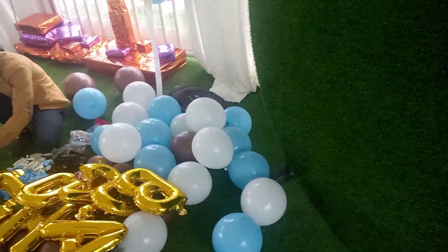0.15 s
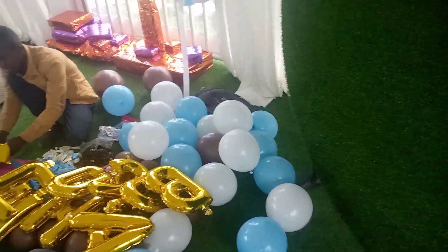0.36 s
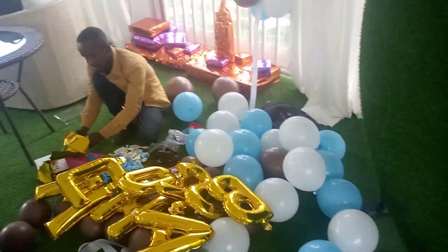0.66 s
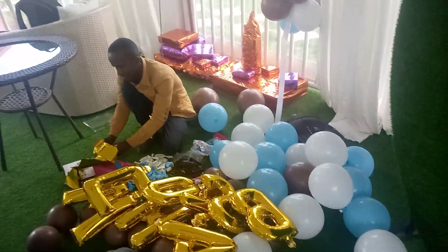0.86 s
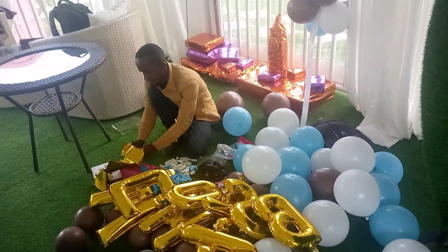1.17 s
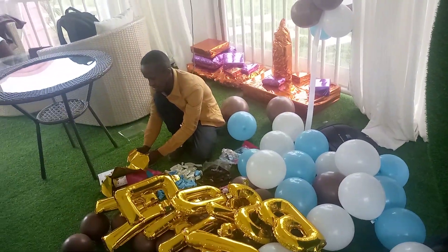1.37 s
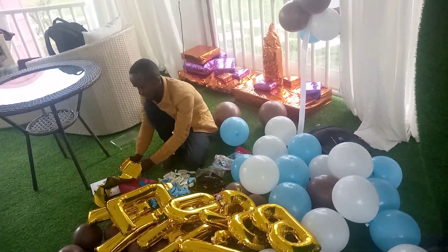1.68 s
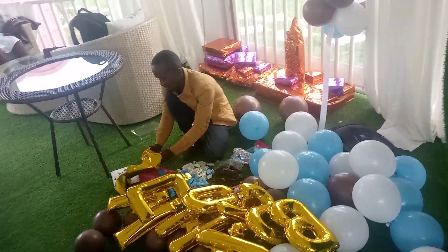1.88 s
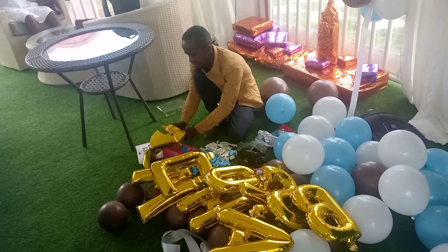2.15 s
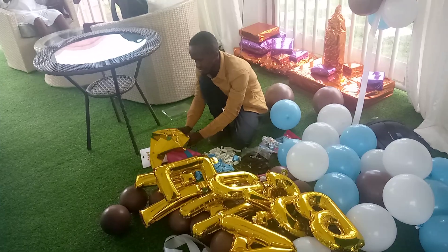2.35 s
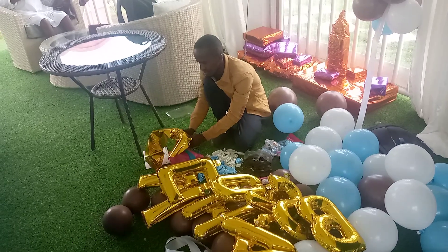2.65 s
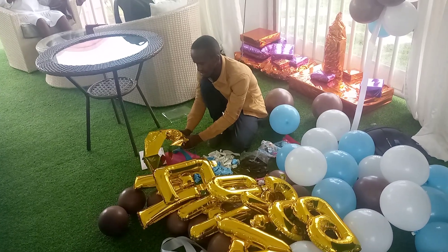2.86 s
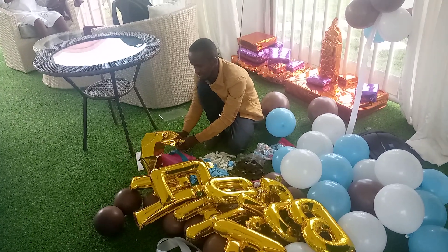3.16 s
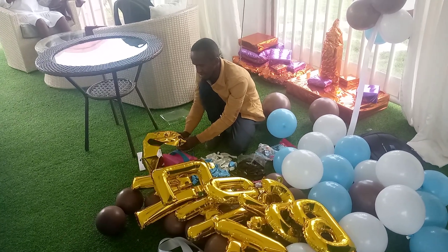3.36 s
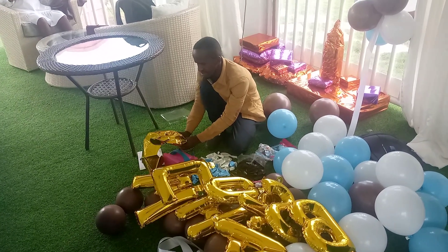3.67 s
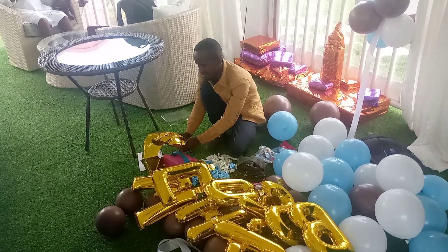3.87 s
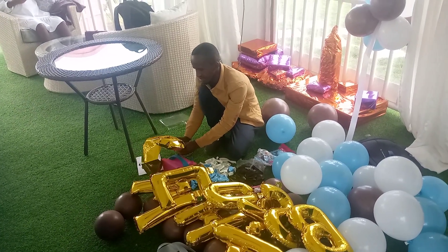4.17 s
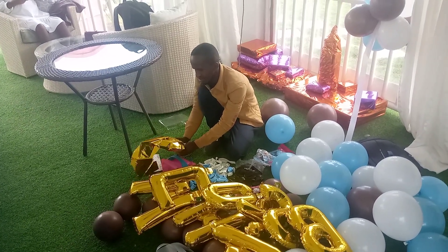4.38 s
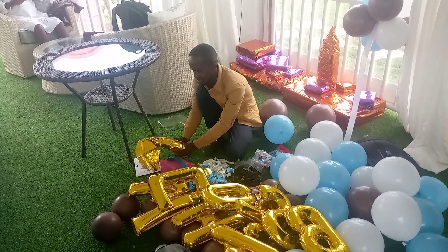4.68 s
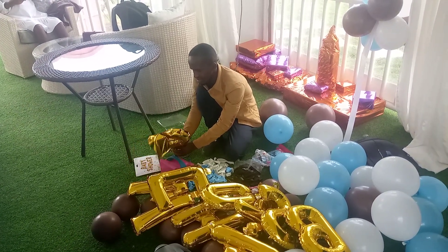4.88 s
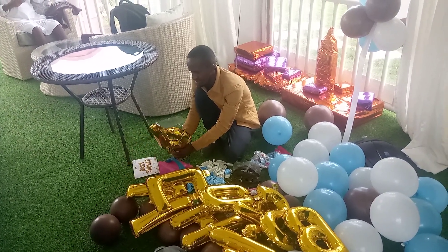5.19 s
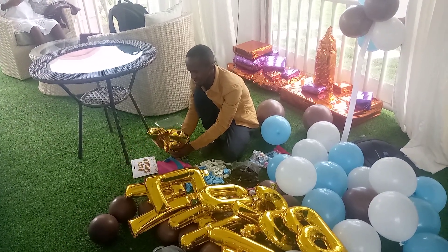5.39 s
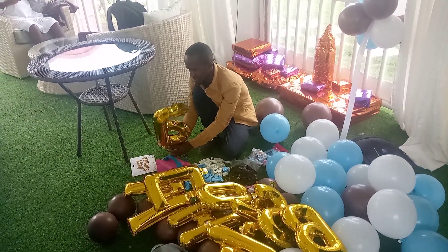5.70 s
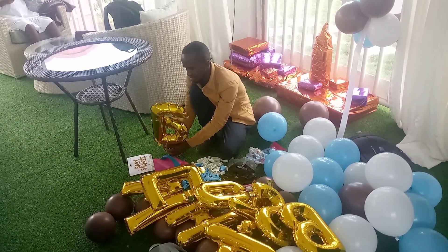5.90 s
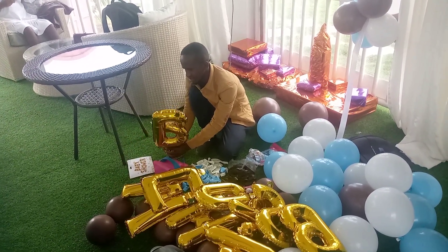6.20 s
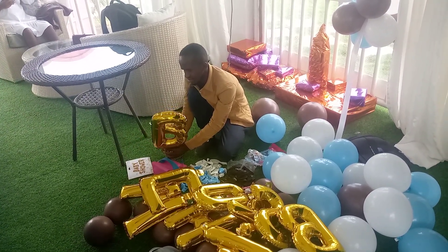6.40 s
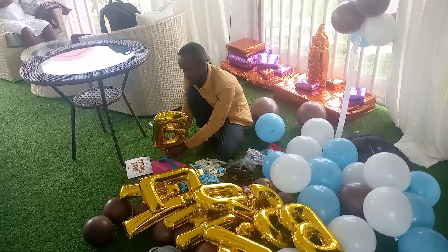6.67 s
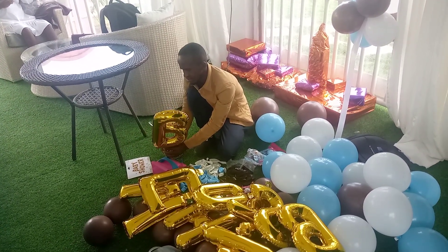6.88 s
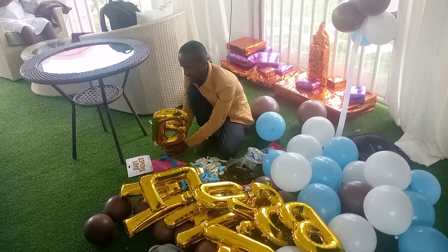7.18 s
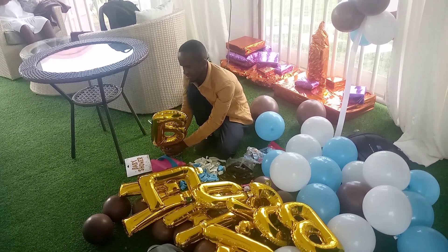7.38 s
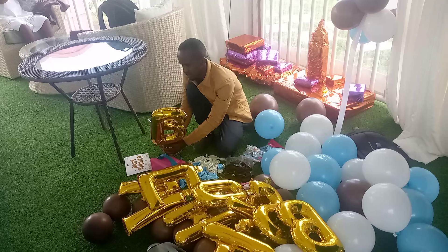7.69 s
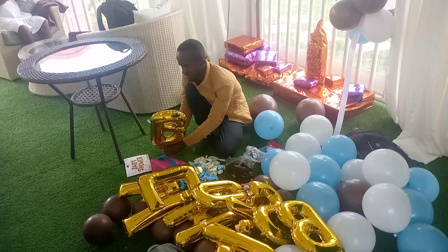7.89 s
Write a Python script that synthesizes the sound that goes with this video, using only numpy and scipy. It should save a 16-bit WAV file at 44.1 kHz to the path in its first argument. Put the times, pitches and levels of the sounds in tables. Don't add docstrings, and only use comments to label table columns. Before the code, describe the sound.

Foil rustles and rubber squeaks onto a nozzle, then a small electric blower whirs up, roars, coasts down, and runs once more.

```python
import sys
import numpy as np
from scipy import signal
from scipy.fft import rfft, irfft, next_fast_len
from scipy.io import wavfile
from scipy.ndimage import uniform_filter1d, map_coordinates

SR = 44100
rng = np.random.default_rng(int(sys.argv[2]) if len(sys.argv) > 2 else 0)


def wav_out(sig):
    wavfile.write(sys.argv[1], SR, np.round(np.clip(np.atleast_2d(sig).T, -1, 1) * 32767).astype(np.int16))


def elevation(decibels):
    levels = np.asarray(decibels, float)
    return 10 ** (levels / 20)


N = 354986
SECONDS = np.arange(N) / SR

# pitch_hz, density_db (per Hz)
ROOM_TONE = [(15, -52), (25, -18), (86, -0.5), (299, -17), (1040, -23), (1640, -17), (1820, -21),
             (2260, -19), (2890, -29), (3880, -23), (15800, -48)]
# pitch_hz, t60_s
ROOM_DECAY = [(200, 0.66), (1000, 0.58), (5000, 0.25), (12000, 0.16)]

# pitch_hz, density_db (per Hz)
RUSTLE_COLOUR = [(120, -56), (200, -31), (774, -19), (1830, -5.5), (2630, -13), (3050, -6), (3340, -6),
                 (4480, -7), (5280, -12), (7200, -9), (10000, -40), (15800, -28)]
# peak_s, level_db, rise_s, fall_s (20 dB each way)
RUSTLE_STROKES = [
    (.03, -73, .04, .1),
    (.11, -67.5, 0.17, .12),
    (.2, -65, .03, 0.46),
    (.4, -64.5, 0.43, 0.23),
    (.47, -65, .1, 0.25),
    (.54, -70, .3, .04),
    (.615, -72.5, .15, .03),
]
# peak_s, level_db, pitch_hz
CREASES = [
    (0.0184, -52, 5420),
    (0.0667, -51, 3000),
    (0.1933, -44.5, 3100),
    (0.2044, -49, 3000),
    (0.39, -45, 3080),
    (0.6094, -60, 4050),
    (1.0919, -58, 2180),
    (1.1129, -58, 2540),
]
# peak_s, level_db
BUMPS = [
    (.022, -79),
    (.176, -73),
    (.28, -70),
    (.35, -57.5),
    (.39, -66),
    (.456, -64),
    (.578, -68),
    (.612, -72),
]
# pitch_hz, density_db (per Hz)
CREASE_COLOUR = [(600, -40), (2000, -5), (6000, 7), (8000, -5), (10000, -19), (15000, -22)]
BUMP_COLOUR = [(25, -42), (55, 5), (110, -4), (220, -32), (500, -70), (900, -120)]

# pitch_hz, density_db (per Hz)
RUB_COLOUR = [(100, -40), (250, -6), (450, -2), (800, 1), (1200, -5), (1600, -9), (2000, -16), (3000, -40),
              (6000, -90)]
# pitch_hz, width_hz, level_db
SQUEAK_MODES = [(2330, 75, 5), (2520, 68, -6), (3800, 200, -12), (4630, 50, -4), (5340, 54, -4),
                (5800, 130, -27)]
# peak_s, level_db, rise_s, fall_s
PUSHES = [
    (1.034, -60, .003, .12),
    (1.078, -57, .04, .1),
    (1.14, -62, .08, .15),
    (1.25, -71, .15, .3),
]
# peak_s, level_db, rise_s, fall_s
SQUEAK_SWELLS = [
    (1.04, -78, .01, .2),
    (1.094, -64, 0.053, .025),
    (1.116, -67, .025, .07),
    (1.17, -75, .1, .15),
    (1.27, -67, .03, .1),
]

# on_s, off_s, share of full pull
PRESSES = [
    (1.218, 4.869, 1),
    (5.37, 6.759, .99),
]
# shaft_hz, level_db
BLADE_LEVEL = [(405, -67), (461, -56), (510, -62), (590, -53), (670, -44), (720, -45.5), (762, -37),
               (788, -43)]
UNBALANCE_LEVEL = [(405, -60), (450, -50), (510, -42), (620, -42), (700, -38.5), (762, -37), (787, -42),
                   (795, -36.5)]
DOUBLE_LEVEL = [(450, -72), (720, -66), (765, -62), (780, -55), (796, -53)]
# pitch_hz, width_hz, level_db
SHAKEN_MODES = [(508, 12, 0), (600, 14, -8), (652, 12, -2), (684, 10, 1), (722, 10, -9), (761, 11, 1),
                (782, 6, -7), (796, 5, 0)]
# peak_s, level_db, rise_s, fall_s
WHINE_SURGES = [
    (1.262, -57, .006, .02),
    (1.294, -49, .025, .05),
    (1.357, -49, .03, .05),
    (1.4, -52, .06, .1),
    (1.455, -54, .12, .07),
]
# peak_s, level_db, rise_s, fall_s
OVERTONE_SURGES = [
    (1.258, -66, .01, .04),
    (1.318, -62, .1, .04),
]

# pitch_hz, density_db (per Hz)
ROAR_COLOUR = [(47, -50), (80, -20), (107, -15), (208, -15.5), (297, -12), (451, -11.5), (668, -0.5),
               (719, -0.5), (930, -1.5), (1040, -15.5), (1220, -13.5), (1430, -17), (1500, -35),
               (1950, -55), (3300, -120)]
RUSH_COLOUR = [(650, -26), (1100, -7.5), (1430, -13.5), (1580, -3), (1720, -6.5), (2220, -5), (2950, -7),
               (3170, -5.5), (4480, -3.5), (5390, -3.5), (6000, -10), (7800, -40), (13200, -120)]
HISS_COLOUR = [(3300, -47), (5000, -12), (5900, -1.5), (6700, -9), (7500, -8.5), (8300, -16.5),
               (11300, -19.5), (13000, -21), (14000, -23), (14500, -12.5), (15050, -12), (15500, -14),
               (17000, -13.5)]
# pitch_hz, width_hz, level_db (over the stream)
CASING_MODES = [(339.5, 42, 3.5), (381, 14, 0), (508, 11, 5), (605, 14, 1), (652, 14, 2), (684, 16, 6),
                (745, 14, 0), (828, 14, -2), (902, 14, 4), (947, 14, 4), (985, 11, 4), (1115, 16, 1),
                (1240, 25, -1.5), (1884, 47, 2.5), (1945, 54, -1.5), (2256, 240, -3), (2440, 34, -2),
                (3205, 45, 4), (3490, 81, -3.5), (4150, 240, -4), (4360, 65, -20), (4795, 80, 0),
                (5200, 58, -5.5), (6530, 210, 7), (8850, 300, -6), (12100, 300, -2.5), (14400, 300, -3),
                (15460, 100, -2)]
# pitch_hz, width_hz, level_db
SCROLL_BANDS = [(4460, 380, -13), (4854, 370, -1), (5240, 170, -2)]
# time_s, leak_db, back_pressure_db
NECK_FIT = [(1.3, 0.5, -4), (1.75, 1, -19), (1.85, -0.5, -12), (2.3, -1.5, -5), (2.7, -0.6, -3),
            (3.05, -0.2, 0), (3.6, -0.1, 2), (4.7, -0.5, 0), (4.85, 2.5, 0), (5.1, 2, -2), (5.38, 2, -4),
            (5.45, 1.5, -1), (5.7, 2.5, -2), (6, 2.5, -1), (6.7, -0.4, -6), (7.3, 3, .3), (8.05, 0.1, -2)]

# peak_s, level_db
ROCKING = [(1.55, -76), (2.22, -64), (2.82, -61), (3.44, -59), (4.16, -65), (4.74, -60.5), (5.34, -71),
           (5.96, -63), (6.64, -58), (7.28, -59), (7.92, -61)]
# pitch_hz, density_db (per Hz)
RUMBLE_COLOUR = [(15, -30), (40, -15), (75, 3), (130, -8), (300, -60), (600, -120)]
# start_s, length_s, from_hz, to_hz, level_db
NECK_WHISTLE = (2.32, .28, 2010, 2480, -46)
# peak_s, level_db, rise_s, fall_s
TURNS = [
    (4.8, -42.5, .2, 0.72),
    (4.92, -43.5, 0.74, .2),
    (5.3, -48, .7, 0.76),
    (5.6, -44, 1, 0.39),
    (6.2, -46, 0.49, .25),
]
# pitch_hz, density_db (per Hz)
FOIL_COLOUR = [(500, -40), (950, 1), (1400, 5.5), (2200, 1.5), (3200, -9), (6000, -30), (12000, -90)]

BLADES, SEGMENTS, MAINS_HZ = 7, 12, 50
FULL_HZ, AUDIBLE_S = 796, 1.256


def unit(x):
    return x / np.sqrt(np.mean(x ** 2) + 1e-20)


def along(points, hz):
    f, v = np.transpose(points)
    return np.interp(np.log(hz + 1), np.log(f + 1), v)


def curves(rows):
    s, *columns = np.transpose(rows)
    return [np.interp(SECONDS, s, column) for column in columns]


def wobble(rate):
    knots = rng.standard_normal(int(N * rate / SR) + 4)
    return map_coordinates(knots, [SECONDS * rate])


def swells(rows):
    gains = []
    for s, db, rise, fall in rows:
        away = np.maximum((s - SECONDS) / rise, (SECONDS - s) / fall)
        gains.append(elevation(db - 20 * away))
    return np.max(gains, axis=0)


def filtered(x, response):
    m = next_fast_len(N + SR // 2)
    return irfft(rfft(x, m) * response(np.fft.rfftfreq(m, 1 / SR)), m)[:N]


def resonances(modes, f):
    return sum(elevation(db) * 1j * f * w / (c * c - f * f + 1j * f * w) for c, w, db in modes)


def turbulence(colour, patchy_db):
    z = signal.stft(rng.standard_normal(N), nperseg=512)[2]
    patches = uniform_filter1d(rng.standard_normal(z.shape), size=8, axis=0)
    patches = uniform_filter1d(patches, size=10, axis=1)
    patchy = signal.istft(z * elevation(patchy_db * unit(patches)), nperseg=512)[1][:N]
    return filtered(patchy, lambda hz: elevation(along(colour, hz)))


def tone(hz, db, unsteady_db):
    level = np.sqrt(2) * elevation(db + unsteady_db * wobble(30))
    return level * np.sin(2 * np.pi * np.cumsum(hz) / SR)


def room(x, wet_db):
    hz, t, z = signal.stft(rng.standard_normal(SR // 3), SR, nperseg=256)
    fade = elevation(-60 * t / along(ROOM_DECAY, hz)[:, None])
    tail = signal.istft(z * fade, SR, nperseg=256)[1]
    delayed = np.pad(x, (200, 0))
    wet = signal.fftconvolve(delayed, tail / np.linalg.norm(tail))[:N]
    return (x + elevation(wet_db) * wet) / np.sqrt(1 + elevation(2 * wet_db))


def room_tone():
    return elevation(-77 - 3.5) * unit(turbulence(ROOM_TONE, patchy_db=1.5))


def creases():
    out, t = np.zeros(N), SECONDS[:SR // 20]
    for s, db, hz in CREASES:
        sharpness = np.clip((hz - 2500) / 500, .04, 1)
        crack = sharpness * rng.standard_normal(len(t)) * elevation(-60 * t / 0.051) * (1 - np.exp(-t / 0.0025))
        ping = np.sin(2 * np.pi * hz * t) * elevation(-60 * t / 0.047)
        out[round((s - .002) * SR):][:len(t)] += elevation(db - 6.0) * (1.2 * crack + 0.5 * ping)
    return filtered(out, lambda f: elevation(along(CREASE_COLOUR, f)))


def hands():
    rustle = unit(elevation(1.2 * wobble(180)) * turbulence(RUSTLE_COLOUR, patchy_db=3.5))
    bumps = unit(turbulence(BUMP_COLOUR, patchy_db=3.0))
    rise_s, fall_s = 0.055, 0.053
    bump_gain = swells([(s, db, rise_s, fall_s) for s, db in BUMPS])
    return swells(RUSTLE_STROKES) * rustle + bump_gain * bumps + creases()


def nozzle():
    slips = elevation(2.5 * wobble(69))
    rub = unit(slips * turbulence(RUB_COLOUR, patchy_db=0.0))
    squeak = filtered(rng.standard_normal(N),
                      lambda f: 0.17 * (f < 6300) * (f > 1500) + resonances(SQUEAK_MODES, f))
    return swells(PUSHES) * rub + swells(SQUEAK_SWELLS) * unit(slips * squeak)


def motor():
    stall_hz_per_s, knee_hz, knee_power = 2497, 513, 2.871
    drag_hz_per_s, drag_power = 838, 1.838
    ms = np.arange(N * 1000 // SR + 2) / 1000
    pressed = sum(share * (ms >= on) * (ms < off) for on, off, share in PRESSES)
    hz, pull = np.zeros(len(ms)), np.zeros(len(ms))
    for k in range(1, len(ms)):
        before = hz[k - 1]
        pull[k] = pressed[k - 1] / (1 + (before / knee_hz) ** knee_power)
        drag = drag_hz_per_s * (before / 1000) ** drag_power
        hz[k] = before + (stall_hz_per_s * pull[k] - drag) / 1000
    smooth_hz = uniform_filter1d(np.interp(SECONDS, ms, hz), size=1000)
    return smooth_hz * (1 + 0.000612 * wobble(5)), np.interp(SECONDS, ms, pull)


def commutator(shaft_hz):
    sparking_hz = SEGMENTS * shaft_hz + 70 * wobble(300)
    whine = swells(WHINE_SURGES) * tone(sparking_hz, 0, unsteady_db=1.5)
    overtone = swells(OVERTONE_SURGES) * tone(2 * sparking_hz, 0, unsteady_db=1.5)
    pulsing = 1 + .8 * np.cos(4 * np.pi * MAINS_HZ * SECONDS)
    return (SECONDS > AUDIBLE_S) * pulsing * (whine + overtone)


def rotor(shaft_hz):
    turning = np.clip((shaft_hz - 420) / 40, SECONDS > 2, 1)
    unbalance_db = along(UNBALANCE_LEVEL, shaft_hz) + 1.5 * wobble(9)
    unbalance = tone(shaft_hz, unbalance_db, unsteady_db=2.2)
    shake = filtered(turning * unbalance, lambda f: .25 + resonances(SHAKEN_MODES, f))
    double = tone(2 * shaft_hz, along(DOUBLE_LEVEL, shaft_hz) + .1, unsteady_db=1.0)
    blade_db = along(BLADE_LEVEL, shaft_hz) + 0.61 + 1.3 * wobble(9)
    blades = tone(BLADES * shaft_hz, blade_db, unsteady_db=1.2)
    ringing = filtered(turning * (double + blades), lambda f: 1 + resonances(CASING_MODES, f))
    return shake + room(ringing, wet_db=-18.5) + room(commutator(shaft_hz), wet_db=-4)


def hum(pull):
    load = uniform_filter1d(pull, size=30000, origin=14000)
    powered = (SECONDS > AUDIBLE_S) * (pull > 0)
    buzz = tone(np.full(N, 2 * MAINS_HZ), -64.5, unsteady_db=1.5)
    return powered * (4 * np.abs(load)) ** 0.67 * buzz


def flow(shaft_hz, power):
    since_s = np.clip(SECONDS - AUDIBLE_S, 0, None)
    filled = 1 - np.exp(-(since_s / 0.059) ** 2)
    return filled * (shaft_hz / FULL_HZ) ** power


def air(shaft_hz):
    leak_db, _ = curves(NECK_FIT)

    def stream(colour):
        noise = turbulence(colour, patchy_db=-0.15)
        return unit(filtered(noise, lambda f: 1 + np.abs(resonances(CASING_MODES, f))))

    gust_db = 0.32 * wobble(8) + 0.4 * wobble(25)
    roar_gain = flow(shaft_hz, 1.15) * elevation(-36 + 0.29 * leak_db + 0.59 * wobble(12))
    rush_gain = flow(shaft_hz, 2.53) * elevation(-37 + 0.36 * leak_db + gust_db)
    hiss_gain = flow(shaft_hz, 2.67) * elevation(-39.5 + leak_db + gust_db)
    return roar_gain * stream(ROAR_COLOUR) + rush_gain * stream(RUSH_COLOUR) + hiss_gain * stream(HISS_COLOUR)


def scroll(shaft_hz):
    _, pressure_db = curves(NECK_FIT)
    bands = filtered(turbulence([(20, 0)], patchy_db=-0.5), lambda f: resonances(SCROLL_BANDS, f) ** 2)
    return flow(shaft_hz, 4.7) * elevation(-39 + pressure_db + 0.75 * wobble(36)) * unit(bands)


def sway():
    rise_s, fall_s = 0.33, 0.59
    rocking = swells([(s, db, rise_s, fall_s) for s, db in ROCKING])
    return rocking * unit(turbulence(RUMBLE_COLOUR, patchy_db=3.5))


def whistle():
    start, length, from_hz, to_hz, db = NECK_WHISTLE
    u = (SECONDS - start) / length
    glide = 1 / (1 + np.exp(-np.clip((u - .4) / .1, -30, 30)))
    outside = np.clip(np.maximum(.1 - u, u - 1), 0, None)
    return tone(from_hz + (to_hz - from_hz) * glide, db - 80 * outside, unsteady_db=2)


def balloon():
    return swells(TURNS) * unit(elevation(2.9 * wobble(120)) * turbulence(FOIL_COLOUR, patchy_db=3.0))


def scene():
    shaft_hz, pull = motor()
    blown = room(air(shaft_hz) + scroll(shaft_hz), wet_db=-12.0)
    blower = rotor(shaft_hz) + hum(pull) + blown
    handling = hands() + room(nozzle(), wet_db=-6.5) + sway()
    mono = room_tone() + handling + blower + whistle() + balloon()
    return np.array([mono, mono])


def low_pass(x):
    return signal.sosfilt(signal.butter(12, 16860, fs=SR, output="sos"), x)


def record(dry):
    kept = filtered(dry[0], lambda hz: np.clip((15740 - hz) / 40, 0, 1))
    return low_pass(np.array([kept, kept]))


dry = scene()
out = record(dry)
wav_out(out)
```